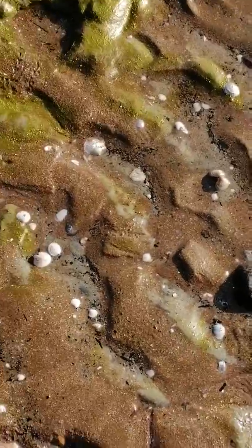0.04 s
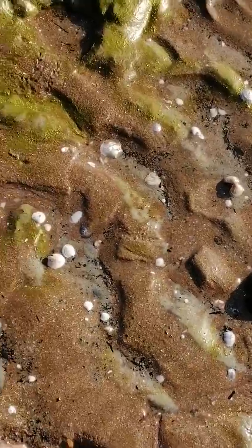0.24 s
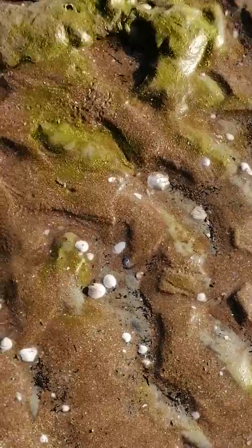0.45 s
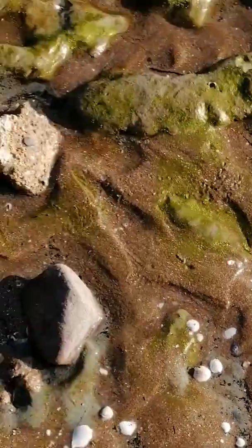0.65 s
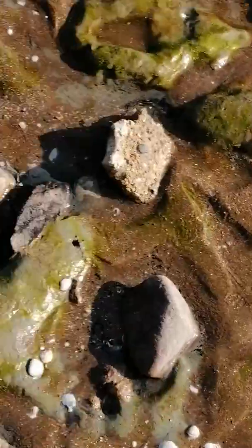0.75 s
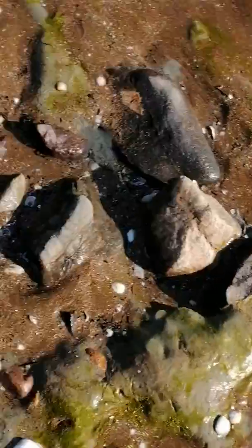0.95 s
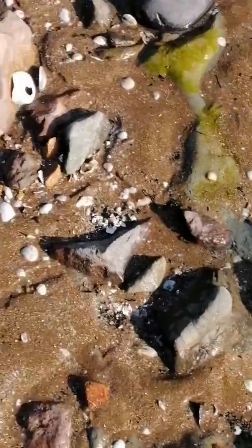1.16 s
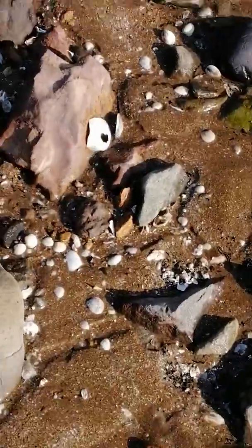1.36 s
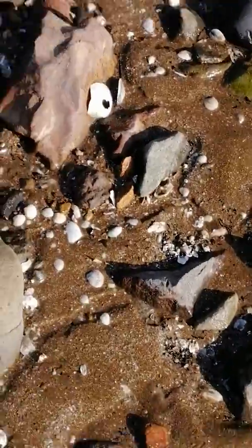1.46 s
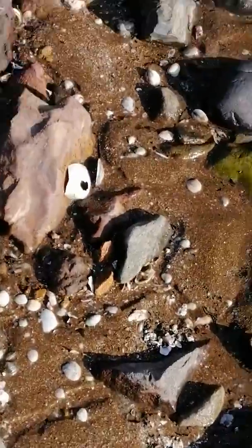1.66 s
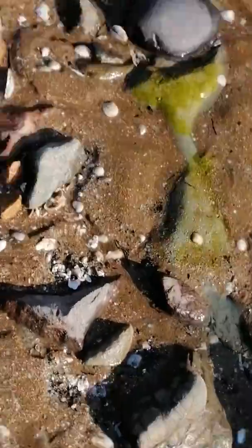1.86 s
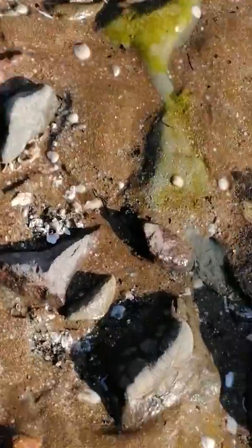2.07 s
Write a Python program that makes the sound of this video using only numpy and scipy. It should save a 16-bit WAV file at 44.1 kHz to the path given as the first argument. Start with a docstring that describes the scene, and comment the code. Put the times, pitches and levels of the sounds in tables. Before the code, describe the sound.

Stones and shells clack and knock in a hollow plastic pail, close and to the right, over faint steady surf hiss. Faint rolling and tiny ticks come first; hollow knocks start at 0.36 s, with a strong clack at 0.54. A dense clatter with a deep thud comes at 0.95-1.0, a sharp clack at 1.25, then lighter gritty clicks from 1.5, thinning towards 2 s.

```python
"""Far surf hisses on a beach while stones faintly roll; soon clacks and hollow knocks join in.
Stones and shells are gathered into a plastic pail, right of a small stereo microphone.
The surf is filtered noise, and grit is a crowd of tiny random grains.
Clacks mix short sine rings with a noise crack and tail.
Knocks and rolling are noise bursts and random clicks that ring the pail's belly, wall and rim."""
import sys
import numpy as np
from scipy import signal
from scipy.fft import rfft, irfft
from scipy.io import wavfile
from scipy.ndimage import uniform_filter1d

SR = 44100
rng = np.random.default_rng(int(sys.argv[2]) if len(sys.argv) > 2 else 0)


def int16_out(signal):
    """Quantize to a 16-bit WAV file."""
    q = np.round(np.clip(np.atleast_2d(signal).T, -1, 1) * 32767)
    wavfile.write(sys.argv[1], SR, q.astype(np.int16))


def magnitude_from_level(level_db):
    """Linear magnitude for a level in decibels (20 dB per decade)."""
    exponent = np.asarray(level_db, float) / 20
    return 10 ** exponent


N = 92610  # samples in the scene

# tone filter of grit and of clack tails: pitch_hz [Hz], gain_db [dB]
GRIT_TONE = [(500, -9), (2050, -3), (7590, -17.5), (15500, -32.5)]
CRACK_T60, RING_T60 = 0.012, 0.015  # seconds to fall 60 dB: stone noise, stone ring


def evened(x):
    """Scales a sound to an rms level of 1."""
    return x / np.sqrt(np.mean(x ** 2))


def colour(x, points):
    """Filters by a table of pitch (Hz) and gain (dB), joined up along a log pitch scale."""
    f, db = np.transpose(points)
    hz = np.fft.rfftfreq(x.shape[-1], 1 / SR)
    gain = magnitude_from_level(np.interp(np.log(hz + 1), np.log(f + 1), db))
    return irfft(rfft(x) * gain, x.shape[-1])


def soften(x, hz):
    """Low-pass filter: contacts take time, which dulls them."""
    return signal.sosfilt(signal.butter(N=2, Wn=hz, fs=SR, output="sos"), x)


def fade(t, t60):
    """Gain that falls 60 dB in t60 seconds."""
    return magnitude_from_level(-60 * t / t60)


def add(mix, s, sound):
    """Mixes a sound in at s seconds, cut off at the end of the mix."""
    part = mix[..., round(s * SR):][..., :sound.shape[-1]]
    part += sound[..., :part.shape[-1]]


def clicks(per_s, spread_db, clump_db):
    """Random contacts, most small, a few large, that come in louder and softer clumps."""
    size_db = spread_db * np.minimum(rng.exponential(1, N), 4)
    size = magnitude_from_level(size_db) * rng.choice([-1., 1.], N)
    happens = rng.random(N) < per_s / SR
    slow = uniform_filter1d(rng.standard_normal(N), size=500)
    clump = evened(uniform_filter1d(slow, size=500))
    return evened(size * happens * magnitude_from_level(clump_db * clump))


def roll(column):
    """Gain over time of one column of the rolling curve."""
    # stones rolling: start_s [s], wall_db [dB], rim_db [dB], grit_db [dB], before the mix gains
    curve = np.array([(0.019, -56, -53, -82), (0.119, -40, -40, -58), (.27, -41, -33, -58),
                      (0.583, -39, -43.5, -36), (0.684, -46.5, -41.5, -43), (0.741, -38, -29.5, -33),
                      (0.803, -46, -62, -64), (.9, -65, -66, -54), (1.027, -32.5, -67, -34.5),
                      (1.15, -50, -57, -44), (1.394, -43, -54, -36), (1.47, -61, -82, -47),
                      (1.544, -36.5, -36, -36.5), (1.62, -50, -51, -42), (1.698, -37, -45, -40.5),
                      (1.778, -51.5, -61.5, -49.5), (2.1, -72, -63, -45)])
    return magnitude_from_level(np.interp(np.arange(N) / SR, curve[:, 0], curve[:, column]))


def two_sides(noise):
    """Turns three noises (shared, left, right) into a left and right that are slightly alike."""
    same = 0.065
    return same * noise[0] + np.sqrt(1 - same ** 2) * noise[1:]


def surf():
    """Far surf as a smooth hiss, with extra bass noise shared by both sides."""
    # surf tone filter: pitch_hz [Hz], gain_db [dB]
    surf_tone = [(165, -2.5), (1200, -8.5), (2100, -19), (4300, -16.5), (5200, -6.5), (7600, -7.5),
                 (9500, -28.5)]
    level_db, bass_hz, bass_gain = -51, 490, 2.82
    bass = soften(rng.standard_normal(N), bass_hz)
    hiss = rng.standard_normal((2, N)) + bass_gain * bass
    return magnitude_from_level(level_db) * evened(colour(hiss, surf_tone))


def grit():
    """Grit crunches: each random grain gives a tiny noise burst with one of eight rings."""
    grits_per_s, spread_db, clump_db = 1700, 5, 2
    ring_gain = 0.27
    t, kinds = np.arange(300) / SR, np.arange(8)[:, None]
    ring_hz = np.geomspace(1320, 5630, num=len(kinds))[:, None]
    grain = two_sides(rng.standard_normal((3, len(kinds), len(t))) * fade(t, CRACK_T60))
    grain += ring_gain * fade(t, RING_T60) * np.sin(2 * np.pi * ring_hz * t)
    chosen = rng.integers(len(kinds), size=N) == kinds
    hits = clicks(grits_per_s, spread_db, clump_db) * chosen
    crunch = signal.fftconvolve(hits[None], grain, axes=2)[..., :N].sum(1)
    return roll(3) * evened(colour(crunch, GRIT_TONE))


def clacks():
    """Stone hits stone: a few brief ringing tones, a bright crack and a gritty tail."""
    # clacks: start_s [s], level_db [dB], ring_hz [Hz, before small random detuning],
    # bright_db [dB, crack against ring before its fade]
    clack_list = [(0.2056, -35, 1590, -33), (0.2284, -35.5, 1320, -28), (0.357, -25, 1210, -9.5),
                  (0.5022, -33, 1330, -6.5), (0.5362, -10, 1340, -42), (0.626, -20, 2210, -12),
                  (0.6921, -31.5, 1980, -18), (0.8031, -39, 3460, 5), (0.826, -29.5, 1840, -9.5),
                  (0.9238, -23, 1340, -39), (0.9493, -15, 1250, -56), (0.9616, -12.5, 2456, -7.5),
                  (0.9944, -19, 2030, -11), (1.0318, -23.5, 1726, -9), (1.0908, -24, 2150, -12),
                  (1.103, -27, 3120, -16), (1.1278, -34.5, 5170, 4), (1.1563, -26.5, 2120, -6.5),
                  (1.1911, -16.5, 1680, -18), (1.2145, -19.5, 2010, -13), (1.248, -9.5, 2048, -21),
                  (1.267, -26.5, 3990, -30), (1.331, -25.5, 2100, -49), (1.3631, -31, 2200, -2.5),
                  (1.4716, -29, 2070, -6.5), (1.5198, -23, 2080, -12), (1.536, -26.5, 3420, -6),
                  (1.5637, -16.5, 2400, -49), (1.5849, -29.5, 4960, -6), (1.696, -29.5, 2790, -32),
                  (1.7173, -30, 2090, -53), (1.7982, -33.5, 2040, -25), (1.818, -29, 1980, -29),
                  (1.8266, -20.5, 2093, -31), (1.916, -30.5, 1960, -20), (1.977, -25, 1230, -46),
                  (1.9975, -29, 1160, -70)]
    # ringing tones of a stone: ratio [times ring_hz], tone_db [dB]
    stone_tones = [(0.996, 5), (1.4, -4), (1.9, -3)]
    crack_hz, rise_s = 6850, 0.00076
    tail_db, tail_per_bright, tail_t60 = -4.5, 0.17, 0.091  # duller clacks have a weaker tail
    t, out = np.arange(4000) / SR, np.zeros((2, N))
    for s, level_db, ring_hz, bright_db in clack_list:
        ring = np.zeros(len(t))
        for ratio, tone_db in stone_tones:
            hz = ring_hz * ratio * (1 + 0.068 * rng.standard_normal())
            ring += magnitude_from_level(tone_db) * fade(t, RING_T60) * np.sin(2 * np.pi * hz * t)
        crack = two_sides(rng.standard_normal((3, len(t))))
        crack = evened(soften(np.diff(crack, prepend=0), crack_hz)) * magnitude_from_level(bright_db)
        crack *= fade(t, CRACK_T60) * np.sqrt(20 * t / CRACK_T60)
        tail = evened(colour(two_sides(rng.standard_normal((3, len(t)))), GRIT_TONE))
        tail *= magnitude_from_level(tail_db + tail_per_bright * bright_db) * fade(t, tail_t60)
        add(out, s, magnitude_from_level(level_db) * (ring + crack + tail) * np.minimum(t / rise_s, 1))
    return out


def stones():
    """Clacks and grit together, weaker on the left by an amount that changes over time."""
    # left side against right: start_s [s], left_db [dB]
    left_curve = [(0.9, -8.5), (1.25, -1.67)]
    s, db = np.transpose(left_curve)
    left_db = np.interp(np.arange(N) / SR, s, db)
    return (clacks() + grit()) * magnitude_from_level(np.array([left_db, np.zeros(N)]))


def rings(s, t):
    """Belly, wall and rim of the pail answer a contact at s seconds with fading tones."""
    # pail tones: pitch_hz [Hz, before rim tuning], width_hz [Hz, wider dies faster], level_db [dB]
    pail_tones = [(153.8, 23.5, 4), (289.5, 57.5, 8), (675.4, 70, 34), (1060, 173, 22.5), (1435, 230, 18)]
    # grip and load shift the rim tones: start_s [s], ratio [times the pitch]
    rim_tune = [(0.36, 1.092), (0.42, 1.033), (1.25, 0.97), (1.4, 1.09)]
    group_hz = 220, 520  # belly below, wall between, rim above
    contact_hz = 1670
    out = np.zeros((3, len(t)))
    for hz, width, db in pail_tones:
        group = np.searchsorted(group_hz, hz)
        tune = np.interp(s, *np.transpose(rim_tune)) if group == 2 else 1
        out[group] += magnitude_from_level(db) * np.exp(-np.pi * width * t) * np.sin(2 * np.pi * hz * tune * t)
    return soften(soften(np.diff(out, prepend=0), contact_hz), contact_hz)


def rolling(t):
    """Rolling stones make a stream of small contacts that ring belly, wall and rim."""
    rolls_per_s, spread_db, clump_db, belly_db = 1700, 2, 3.5, -12
    contacts, out = clicks(rolls_per_s, spread_db, clump_db), np.zeros((3, N))
    step = SR // 20  # the rim pitch is looked up anew for each block
    for k in range(0, N, step):
        block = contacts[None, k:k + step]
        add(out, k / SR, signal.fftconvolve(rings(k / SR, t), block, axes=1))
    belly, wall, rim = [evened(part) for part in out]
    # the belly follows the wall's curve
    return np.array([roll(1) * magnitude_from_level(belly_db) * belly, roll(1) * wall, roll(2) * rim])


def knocks(t):
    """Each knock is a short noisy contact that rings belly, wall and rim."""
    # knocks: start_s [s], rim_db, belly_db, wall_db [peak dB before the pail gains],
    # contact_s [s, time scale of the contact]
    knock_list = [(0.358, -13.5, -22.5, -14.5, 0.0082), (0.4, -15.5, -37, -29, 0.0036),
                  (0.433, -14.5, -24.5, -46, 0.0042), (0.498, -19, -29, -27, 0.013),
                  (0.538, -17.5, -27.5, -17.5, 0.024), (0.718, -16.5, -27, -54, 0.0025),
                  (0.75, -18, -44, -29, 0.0094), (0.949, -19, -29, -28, 0.0026),
                  (0.9606, -18.5, -15.5, -11.5, 0.0043), (0.991, -23, -25, -24.5, 0.016),
                  (1.092, -26.5, -31.5, -23.5, 0.0074), (1.251, -30.5, -40.5, -22, 0.0054),
                  (1.516, -52, -25, -40, 0.016), (1.825, -28, -55, -30, 0.012)]
    out = np.zeros((3, N))
    for s, rim_db, belly_db, wall_db, contact_s in knock_list:
        u = t / contact_s
        hits = rng.standard_normal(len(t)) * u * np.exp(-2 * u)
        hits[:3] = 0.57  # firm first touch
        knock = signal.fftconvolve(rings(s, t), hits[None], axes=1)
        knock /= abs(knock).max(1, keepdims=True)
        add(out, s, magnitude_from_level(np.array([[belly_db], [wall_db], [rim_db]])) * knock)
    return out


def pail():
    """Knocks and rolling ring the hollow pail, which is weaker on the left side."""
    # left side against right: one level [dB] each for belly, wall, rim
    left_db = [-11, -13, -10]
    gain_db = 6
    t = np.arange(6000) / SR
    parts = knocks(t) + rolling(t)
    left = magnitude_from_level(np.array(left_db)) @ parts
    return magnitude_from_level(gain_db) * np.array([left, parts.sum(0)])


def scene():
    """Pail and stones lie to the right, so their sound reaches the left side later."""
    left_lag_s = 0.00031
    left, right = pail() + stones()
    return np.array([np.roll(left, round(left_lag_s * SR)), right]) + surf()


def band_limit(x):
    """A steep low-pass at the top of the band."""
    return signal.sosfilt(signal.butter(12, 16370, fs=SR, output="sos"), x)


def record(dry):
    """The microphone cuts the deep bass and rolls off the treble."""
    low_cut_hz, top_hz = 54, 13000
    band = signal.butter(N=2, Wn=[low_cut_hz, top_hz], btype="band", fs=SR, output="sos")
    mix = signal.sosfilt(band, dry)
    return band_limit(mix)


dry = scene()
out = record(dry)
int16_out(out)
```